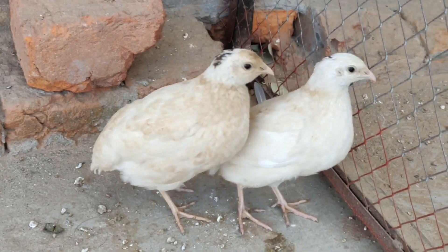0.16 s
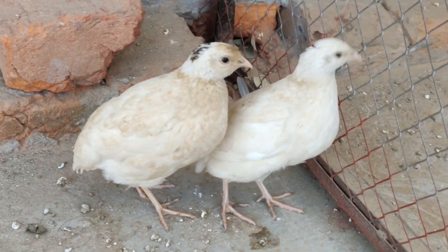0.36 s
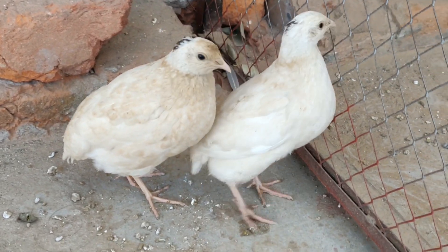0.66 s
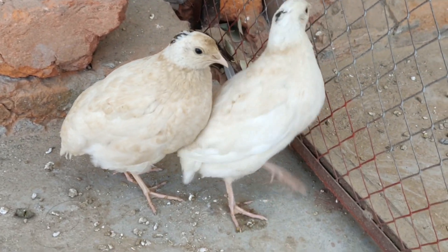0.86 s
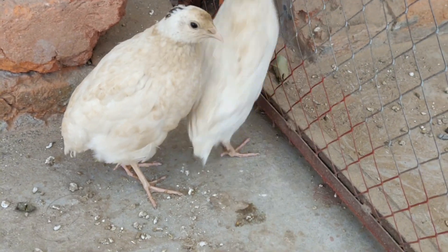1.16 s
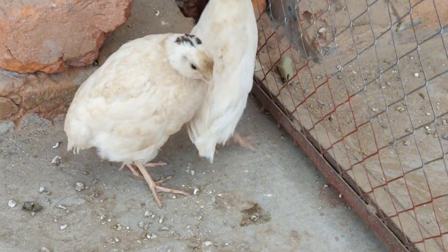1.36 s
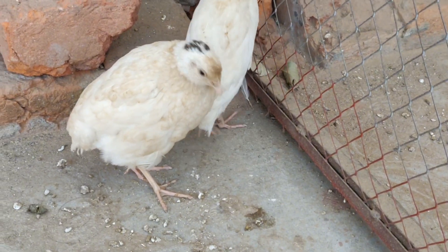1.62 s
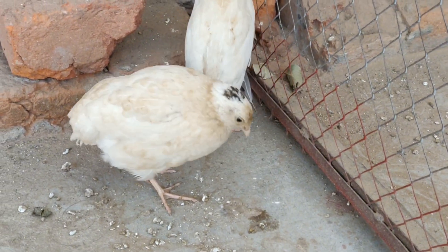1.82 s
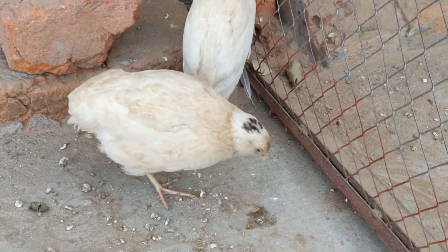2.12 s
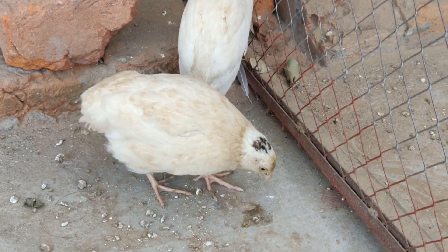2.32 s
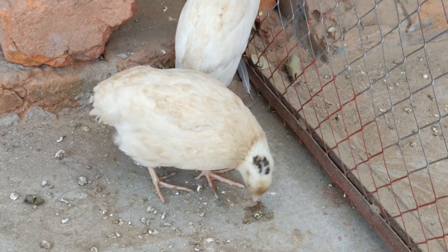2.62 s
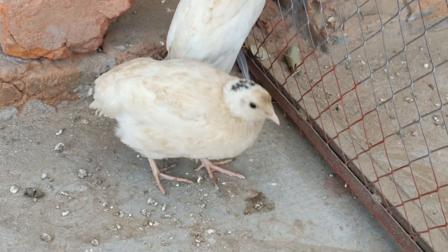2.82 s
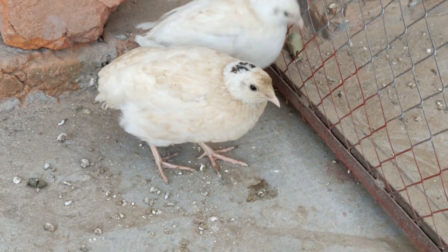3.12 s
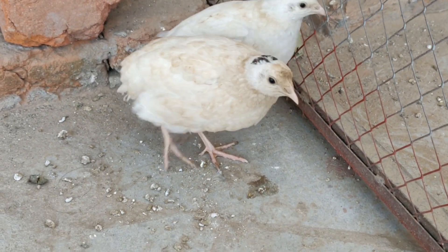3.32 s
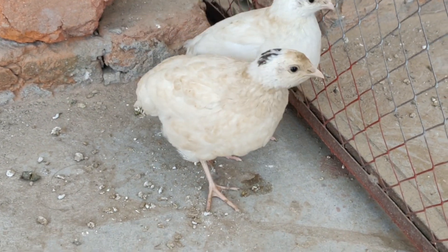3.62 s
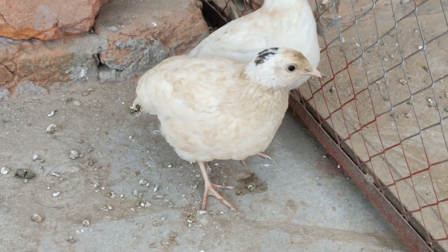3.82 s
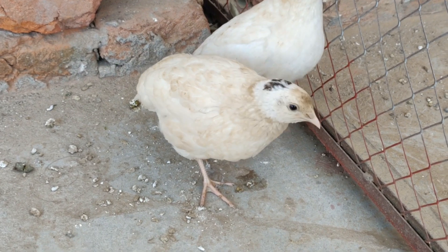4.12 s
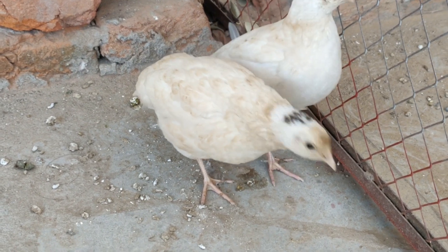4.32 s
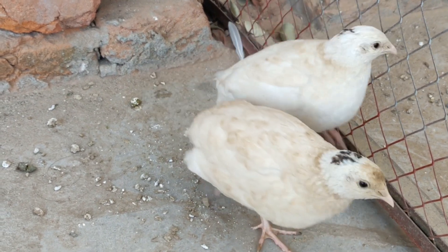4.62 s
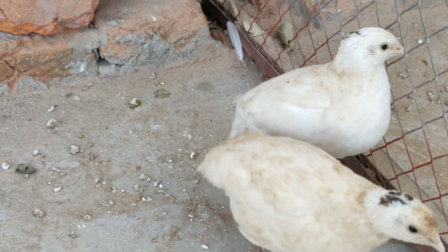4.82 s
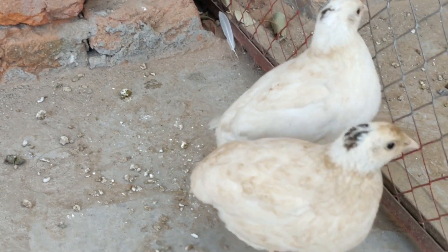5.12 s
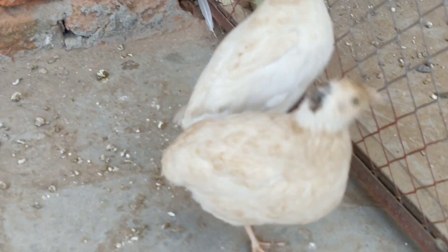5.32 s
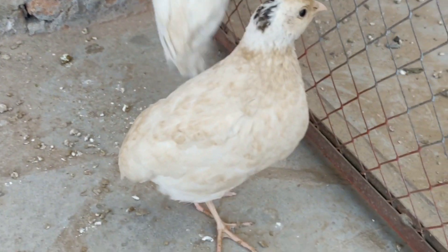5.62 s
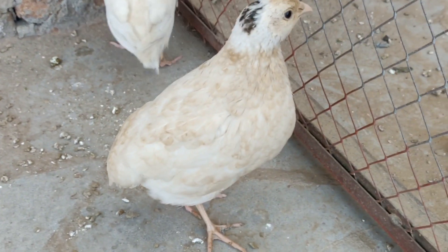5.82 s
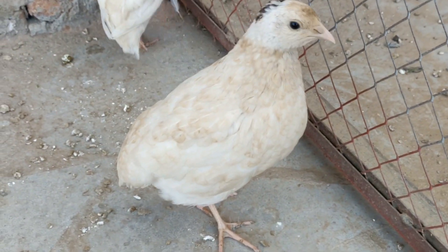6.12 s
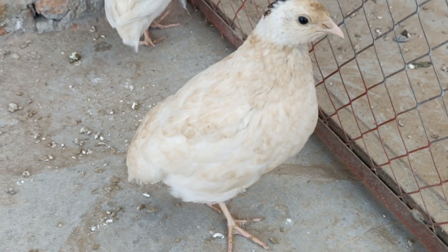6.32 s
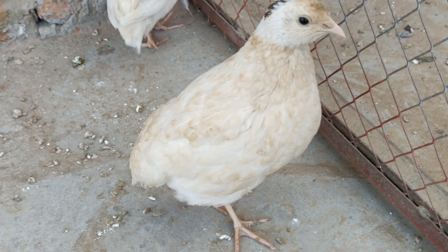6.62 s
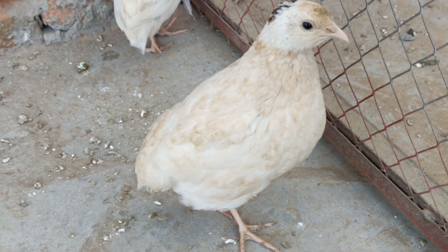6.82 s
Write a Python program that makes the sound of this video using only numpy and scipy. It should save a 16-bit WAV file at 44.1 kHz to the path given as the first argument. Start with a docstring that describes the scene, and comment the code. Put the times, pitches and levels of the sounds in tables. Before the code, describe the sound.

A quail in an outdoor pen gives two short rising calls, each breaking into a rattling rasp, over faint birdsong, insects and a swelling airy hush.

```python
"""In an outdoor pen one short rising quail call sounds twice, the same each time: a clean note breaks into a
rasp and falls. The call is a sum of four harmonics, choked by a quickening rattle and roughened by noise.
Behind it small birds whistle at first (bent sines), a cricket chirps (short sagging tones) and a bush cricket
buzzes (pulsed noise), while a hush of coloured noise wavers, then swells. Later come a dry tick (ringing
modes), soft rustles (noise), a far cry (a falling tone) and a brief cluck."""
import sys
import numpy as np
from scipy import signal
from scipy.fft import rfft, irfft
from scipy.io import wavfile
from scipy.ndimage import map_coordinates

SR = 44100
rng = np.random.default_rng(int(sys.argv[2]) if len(sys.argv) > 2 else 0)


def digitize_waveform(pressure):
    """Quantize a signal to 16-bit integers and store it at the path in sys.argv[1].

    Rows of a 2-D input are taken as channels; values are limited to [-1, 1].
    """
    field = np.atleast_2d(pressure).T
    bounded = np.clip(field, -1, 1)
    quanta = np.round(bounded * 32767).astype(np.int16)
    wavfile.write(sys.argv[1], SR, quanta)


N = 306936
T = np.arange(N) / SR   # time [s]

# Repeats of the call: delay_s [s], level_db [dB]
CALL_REPEATS = [(0, 0), (.9, -.3)]
# Pitch of the call: time_s [s], pitch_hz [Hz]
CALL_PITCH = [(.467, 300), (.492, 409), (.56, 442), (.635, 449.1), (.685, 479), (.768, 489), (.81, 448.7),
              (.868, 386)]
# Effort of the call: time_s [s], level_db [dB]
CALL_EFFORT = [(0.465, -49.5), (.495, -20.5), (.525, -15.5), (.575, -13.5), (.598, -15.5), (.655, -14.5),
               (0.731, -17), (0.768, -6), (.80, -14.5), (.836, -17.5), (.86, -28.5), (.872, -47)]
# The breaking of the voice: time_s [s], strain [0-1], roughness [0-1]
VOICE_BREAK = [(.467, 0.3, 0.54), (.497, 0.15, 0.06), (.645, 0, 0.01), (.724, 0.04, 0.3), (.745, 0.71, 0.6),
               (.768, .97, 0), (.80, 0.7, 0.27), (.835, 0.49, 0.2), (.87, 0.54, 0.7)]
# Relative strength of harmonics 1 to 4: relaxed_db [dB], strained_db [dB]
VOICE_HARMONICS = [(-29, -34.5), (0, -20), (-13.5, -18), (-21, 1.5)]
# The throat briefly tunes in to the third harmonic
BLOOM_S, BLOOM_HALF_S, BLOOM_DB = 0.5664, 0.025, 19
# The rattle: catches come ever faster and shallower (depth 1 chokes the voice, 2 turns it over)
RATTLE_S, CATCH_GAP_S, CATCH_GAP_RATIO, FIRST_DEPTH, LAST_DEPTH = 0.676, 0.0225, 0.93, 2.62, 0.8
# The other side of the syrinx joins the rasp with a sagging note of its own
SECOND_START_S, SECOND_END_S, SECOND_HZ, SECOND_SAG_HZ_PER_S, SECOND_DB = 0.727, 0.864, 1534, 550, -20
CLUCK_S, CLUCK_LENGTH_S = 6.696, 0.025
TICK_S = 2.6258
# Modes of the tick: mode_hz [Hz], level_db [dB], t60_s [s to fall by 60 dB]
TICK_RINGS = [(280, -43, .035), (520, -41, .018), (1150, -32, .005), (2300, -28, .002)]
# Notes of small far birds: start_s [s], length_s [s], first_hz, middle_hz, last_hz [Hz],
# level_db [dB], roughness [about 0-1]
BIRD_NOTES = [(0.013, 0.063, 4700, 4700, 4650, -55.5, 0.95), (0.132, 0.025, 5740, 5500, 5500, -55.5, .5),
              (0.163, 0.068, 4750, 4700, 4650, -54.5, 1.1), (0.253, .2, 4480, 4310, 4100, -55.5, 0.4),
              (0.981, 0.36, 4250, 4480, 4420, -60, .4), (1.351, 0.089, 5450, 5076, 5000, -50.5, 0.69),
              (1.46, .058, 5750, 5390, 5580, -47, .4), (1.547, 0.036, 4800, 4700, 4650, -51, 0.94),
              (1.755, 0.088, 4720, 5000, 4520, -52, 0.72)]
TRILL_PER_S = 54
CRY_S, CRY_LENGTH_S, CRY_HZ, CRY_FALL_HZ, CRY_DB = 5.325, 0.27, 1383, 690, -41
# Cricket chirps: first_stroke_s [s, middle of the stroke], strokes [count]
CRICKET_CHIRPS = [(2.796, 4), (3.176, 4), (3.561, 3), (3.879, 3), (4.205, 4), (4.612, 3), (4.949, 2),
                  (5.225, 4), (5.621, 4), (6.078, 4), (6.481, 4), (6.878, 3)]
CRICKET_HZ, STROKE_PERIOD_S = 4690, 0.0365
# Soft rustles: middle_s [s], half_width_s [s], level_db [dB], low_part_db [dB]
RUSTLE_SWELLS = [(3.62, 0.048, -47, -74), (4.56, 0.15, -46.5, -62), (5.0, 0.12, -43.5, -61.5),
                 (5.5, 0.15, -47.5, -65.5)]
# Swell of the whole yard: time_s [s], level_db [dB, taken relative to YARD_REFERENCE_DB]
YARD_SWELL = [(0.0, -57.5), (0.41, -55.5), (1.26, -59.5), (1.43, -54.5), (1.76, -59), (4.44, -48.5),
              (6.43, -45.5), (6.96, -46.5)]
YARD_REFERENCE_DB = -52
# Relative spectrum of the low rumble: frequency_hz [Hz], level_db [dB]
RUMBLE_SPECTRUM = [(18, -60), (30, -27.5), (108, -6), (140, -5), (216, -7), (274, -6), (336, -7),
                   (400, -8.5), (520, -45.5), (880, -120)]
# Relative spectrum of far middle-range noise: frequency_hz [Hz], level_db [dB]
FAR_SPECTRUM = [(200, -37.5), (275, -2), (350, -9.5), (440, -2), (510, 3), (670, -5), (790, 2), (890, -3),
                (1080, 2), (1330, 0.5), (1620, 0), (2100, -8), (2700, -11.5), (4500, -53)]
# Relative spectrum of the airy hiss: frequency_hz [Hz], level_db [dB]
AIR_SPECTRUM = [(1180, -27), (2000, -4), (4040, -5.5), (4320, -6), (4630, -3), (4880, -6.5), (5000, -8),
                (5180, -7), (6990, -8), (8580, -5), (10400, -7.5), (14100, -8), (15500, -14.5)]
# Likeness of the noise at the two ears: frequency_hz [Hz], likeness [0-1]
EAR_LIKENESS = [(60, 0.82), (130, 1.0), (290, 1), (640, 0.96), (1410, 0.69), (3100, 0.22), (6820, 0.44),
                (15000, 0.37)]
PEN_T60_S = 0.17
CUTOFF_HZ = 15400


def from_db(db):
    """Level and gain: twenty decibels are a factor of ten in amplitude."""
    return 10 ** (np.asarray(db) / 20)


def rms_one(x):
    """Normalisation: scale to an rms of 1."""
    return x / np.sqrt(np.mean(x ** 2) + 1e-20)


def in_time(rows):
    """Linear interpolation: each column of a curve at every sample."""
    times, *columns = np.transpose(rows)
    return [np.interp(T, times, column) for column in columns]


def gate(start, end, edge=0.0074):
    """Gating: open between two times, with linear ramps at the ends."""
    opening = np.clip((T - start) / edge, 0, 1)
    closing = np.clip((end - T) / edge, 0, 1)
    return opening * closing


def bump(offset, width):
    """Gaussian pulse of height 1."""
    return np.exp(-0.5 * np.minimum((offset / width) ** 2, 60))


def arch(start, length):
    """Half-ellipse envelope: progress through a note from 0 to 1, and its rounded gain."""
    progress = np.clip((T - start) / length, 0, 1)
    return progress, np.sqrt(4 * progress * (1 - progress))


def band(x, low_hz, high_hz, order=2):
    """Band-pass filtering with a Butterworth response."""
    edges_hz = [low_hz, min(high_hz, SR * 0.49)]
    sos = signal.butter(order, edges_hz, "band", fs=SR, output="sos")
    return signal.sosfilt(sos, x + 1e-18)


def noise_band(low_hz, high_hz, order=2):
    """Band-limited noise: filtered white noise of rms 1."""
    return rms_one(band(rng.standard_normal(N), low_hz, high_hz, order))


def drift(rate):
    """Slow random modulation: smooth chance up to about this many changes a second, of rms 1."""
    points = rng.standard_normal(int(2 * rate * N / SR) + 4)
    coarse = map_coordinates(points, [2 * rate * T[::8]], order=3)
    return rms_one(coarse)[np.arange(N) // 8]


def phase_of(hz):
    """Frequency modulation: phase is the running sum of frequency."""
    return 2 * np.pi * np.cumsum(hz) / SR


def partial(phase, rough, rasp_rate):
    """Coherent and incoherent power: roughness trades a sine's steady part for a shaking one; rms about 1."""
    rough = np.clip(rough, 0, 1)
    shake = (drift(rasp_rate) + 1j * drift(rasp_rate)) / np.sqrt(2)
    phasor = np.sqrt(1 - rough ** 2) + rough * shake
    return np.sqrt(2) * np.real(phasor * np.exp(1j * phase))


def stereo_noise(spectrum):
    """Interaural coherence: coloured noise, alike at both ears in the bass, less so in the treble; rms 1."""
    log_hz = np.log(np.arange(N // 2 + 1) * SR / N + 1)

    def over_log_hz(rows):
        hz, values = np.transpose(rows)
        return np.interp(log_hz, np.log(hz), values)

    alike = np.clip(over_log_hz(EAR_LIKENESS), 0, 1)
    mid, side = rfft(rng.standard_normal((2, N)))
    ears = np.sqrt(1 + alike) * mid + np.sqrt(1 - alike) * side * [[1], [-1]]
    return rms_one(irfft(from_db(over_log_hz(spectrum)) * ears, N))


def quail(rebound=0.51, jitter=0.012, rasp_rate=110, second_rough=0.9, rasp_air=0.92, catch_air=0.14,
          rumble_db=-56):
    """Voiced source of the syrinx: four harmonics, clean at first, then rattling and rasping."""
    (pitch_hz,), (level_db,) = in_time(CALL_PITCH), in_time(CALL_EFFORT)
    strain, rough = in_time(VOICE_BREAK)
    loudness = from_db(level_db)

    phase = phase_of(pitch_hz * (1 + jitter * rough * drift(60)))
    shares = harmonic_shares(strain)
    voice = loudness * sum(share * partial(k * phase, rough, rasp_rate) for k, share in enumerate(shares, 1))

    second_hz = SECOND_HZ - SECOND_SAG_HZ_PER_S * np.clip(T - SECOND_START_S, 0, 1)
    second = partial(phase_of(second_hz), second_rough, rasp_rate=90)
    voice += from_db(SECOND_DB) * second * gate(SECOND_START_S, SECOND_END_S)

    # A catch chokes the membrane and swings it the other way; the dammed air then drives it harder
    catch, surge = rattle()
    voice *= 1 - catch + rebound * surge

    # Turbulent air fills the gaps between harmonics as the voice roughens, and puffs at each catch
    voice += loudness * (0.01 + rasp_air * rough) * noise_band(850, 1800, order=3)
    voice += loudness * catch_air * catch * noise_band(480, 1400, order=3)

    voice = np.clip(voice, -0.72, 0.72)   # the membrane can swing only so far
    sounding = gate(CALL_EFFORT[0][0], CALL_EFFORT[-1][0])
    voice = band(voice * sounding, 448, 1986, order=10)

    # A faint low rumble rides on the voice
    voice += from_db(rumble_db) * loudness * sounding * noise_band(30, 300, order=1)
    return sum(from_db(db) * np.interp(T - delay, T, voice) for delay, db in CALL_REPEATS)


def harmonic_shares(strain):
    """Power sharing: strain favours the fourth harmonic over the second; the third blooms once before."""
    bloom_db = BLOOM_DB / (1 + ((T - BLOOM_S) / BLOOM_HALF_S) ** 6)
    gains = []
    for k, (relaxed_db, strained_db) in enumerate(VOICE_HARMONICS, 1):
        share_db = relaxed_db + strain * (strained_db - relaxed_db)
        gains.append(from_db(share_db + bloom_db * (k == 3)))
    return np.array(gains) / np.sqrt(np.sum(np.square(gains), axis=0))


def rattle(catch_s=0.0021, rebound_s=0.0046, surge_s=0.0031, count=9):
    """Relaxation oscillation: a quickening run of catches, and a surge of dammed air after each."""
    gaps = CATCH_GAP_S * CATCH_GAP_RATIO ** np.arange(count)
    times = RATTLE_S + np.cumsum(gaps) - gaps
    catches = list(zip(times, np.linspace(FIRST_DEPTH, LAST_DEPTH, count)))
    catch = sum(depth * bump(T - s, catch_s) for s, depth in catches)
    surge = sum(depth / 2 * bump(T - s - rebound_s, surge_s) for s, depth in catches)
    return catch, surge


def cluck(pitch_hz=545, cluck_db=-25.0, rough=0.94, air=1.0):
    """Harmonics mixed with turbulence: a hoarse scrap of voice that swells and stops short."""
    phase = phase_of(np.full(N, pitch_hz))
    harmonics_db = [10, 0.5, -16, -10]
    voice = rms_one(sum(from_db(db) * partial(k * phase, rough, rasp_rate=220)
                        for k, db in enumerate(harmonics_db, 1)))
    voice += air * noise_band(600, 1330)
    swell = np.clip((T - CLUCK_S) / CLUCK_LENGTH_S, 0, 1) ** 0.53
    swell = swell * gate(CLUCK_S, CLUCK_S + CLUCK_LENGTH_S, edge=0.00064)
    return from_db(cluck_db) * band(voice * swell, 687, 2700, order=3)


def tick():
    """Modal decay: one dry knock sets off damped sines, the low ones ringing longest."""
    t = np.maximum(T - TICK_S, 0)
    rings = sum(from_db(db - 60 * np.minimum(t / t60, 3)) * np.sin(2 * np.pi * hz * t)
                for hz, db, t60 in TICK_RINGS)
    return band(rings, 220, 4100, order=4)


def small_birds():
    """Frequency glides: thin whistles, each bending through three pitches, blurred by distance."""
    hz, gain, blur = np.zeros((3, N))
    for start, length, first, middle, last, db, rough in BIRD_NOTES:
        progress, envelope = arch(start, length)
        on = envelope > 0
        bend = np.polyfit([0, 0.5, 1], [first, middle, last], 2)
        hz[on] = np.polyval(bend, progress[on])
        blur[on] = rough
        gain += from_db(db) * envelope
    trill = 1 + blur ** 2 * np.cos(2 * np.pi * TRILL_PER_S * T)   # the rough notes flutter
    return gain * trill * partial(phase_of(hz), blur, rasp_rate=120)


def far_call(rough=0.99, droop_power=3.2, fade_db=13, attack_s=0.018):
    """Joint fall of pitch and level: a blurred cry holds its note, then falls and fades."""
    droop = np.clip((T - CRY_S) / CRY_LENGTH_S, 0, 1) ** droop_power
    envelope = from_db(CRY_DB - fade_db * droop) * gate(CRY_S, CRY_S + CRY_LENGTH_S, edge=attack_s)
    return envelope * partial(phase_of(CRY_HZ - CRY_FALL_HZ * droop), rough, rasp_rate=180)


def cricket(swell_db, chirp_db=-50, follows=1.4, stroke_share=0.16, sag_hz=500, rough=0.57):
    """Stridulation: each wing stroke is a short tone that sags in pitch; chirps grow with the yard."""
    hz, gain = np.full(N, float(CRICKET_HZ)), np.zeros(N)
    for start, strokes in CRICKET_CHIRPS:
        for k in range(strokes):
            s = start + k * STROKE_PERIOD_S
            near = slice(int((s - STROKE_PERIOD_S / 2) * SR), int((s + STROKE_PERIOD_S / 2) * SR))
            turn = (T[near] - s) / STROKE_PERIOD_S   # -0.5 to 0.5 over the stroke
            hz[near] = CRICKET_HZ - sag_hz * turn
            gain[near] = from_db(-2.2 * (k == 0)) * bump(turn, stroke_share)   # first stroke is weaker
    return from_db(chirp_db + follows * swell_db) * gain * partial(phase_of(hz), rough, rasp_rate=260)


def insect_chorus(swell_db, buzz_db=-50.5, stroke_width=0.024, chorus_db=-70.0, shrill_db=-67.5):
    """Pulsed and merged noise: a bush cricket rasps in paired strokes; far crickets form steady bands."""
    cycle = (T * 10.945) % 1   # pairs per second
    strokes = sum(bump(cycle - at, stroke_width) for at in (0.42, 0.74))
    buzz = noise_band(8240, 9040) * strokes * from_db(buzz_db + 0.5 * swell_db)
    crickets = from_db(chorus_db) * noise_band(4520, 4900)
    shrill = from_db(shrill_db) * noise_band(13700, 14150)
    return buzz + from_db(swell_db) * (crickets + shrill)


def rustles(uneven_db=2):
    """Amplitude-modulated noise: soft, uneven middle-range swells with a little weight below."""
    middle = sum(from_db(db) * bump(T - s, width) for s, width, db, _ in RUSTLE_SWELLS)
    low = sum(from_db(db) * bump(T - s, width) for s, width, _, db in RUSTLE_SWELLS)
    noise = middle * stereo_noise(FAR_SPECTRUM) + low * stereo_noise(RUMBLE_SPECTRUM)
    return from_db(uneven_db * drift(16)) * noise


def hush(swell_db, low_db=-68, far_db=-53.0, air_db=-48, low_follows=0.9, far_follows=0.86,
         flutter_db=1.5, air_flutter_db=0.57):
    """Superposed noise bands: low rumble, far middle-range noise and airy hiss, swelling together."""
    rumble_gain = from_db(low_db + low_follows * swell_db + flutter_db * drift(16))
    far_gain = from_db(far_db + far_follows * swell_db + flutter_db * drift(10))
    air_gain = from_db(air_db + swell_db + air_flutter_db * drift(10))
    rumble = rumble_gain * stereo_noise(RUMBLE_SPECTRUM)
    far = far_gain * stereo_noise(FAR_SPECTRUM)
    return rumble + far + air_gain * stereo_noise(AIR_SPECTRUM)


def pen(x, wet_db):
    """Reverberation: brick and concrete give back a short diffuse tail, different at each ear."""
    t = T[:SR // 3]
    tail = rng.standard_normal((2, len(t))) * from_db(-60 * t / PEN_T60_S) * (t > 0.003)
    tail /= np.sqrt(np.sum(tail ** 2, axis=1, keepdims=True))
    return from_db(wet_db) * signal.fftconvolve(x[None], tail, axes=1)[:, :N]


def scene(lean_db=-21):
    """Direct and reverberant sound: near sources are almost dry, the yard behind more reverberant."""
    swell_db = in_time(YARD_SWELL)[0] - YARD_REFERENCE_DB
    near = quail() + cluck() + tick()
    yard = small_birds() + far_call() + cricket(swell_db) + insect_chorus(swell_db)
    # The middle of the near sound's range leans to the right
    lean = from_db(lean_db) * band(near, 1150, 1450) * [[-1], [1]]
    near = near + lean + pen(near, wet_db=-23)
    yard = yard * from_db([[-2], [0]]) + pen(yard, wet_db=-5.5)   # left ear a little weaker
    return near + yard + hush(swell_db) + rustles()


def record(dry):
    """Low-pass filtering: a steep elliptic cut of the top, run both ways so that phase is kept."""
    sos = signal.ellip(8, 0.05, 70, CUTOFF_HZ, fs=SR, output="sos")
    return signal.sosfiltfilt(sos, dry)


dry = scene()
out = record(dry)
digitize_waveform(out)
```